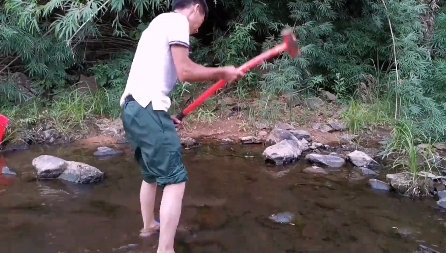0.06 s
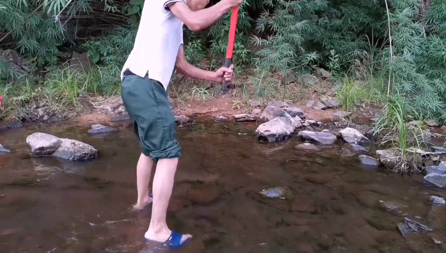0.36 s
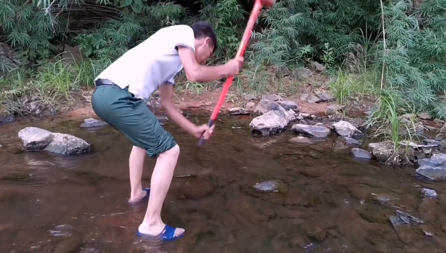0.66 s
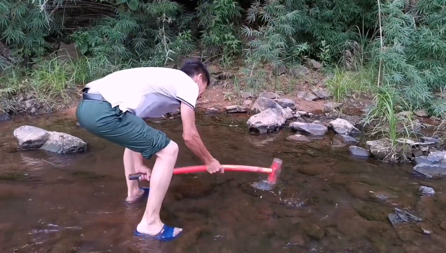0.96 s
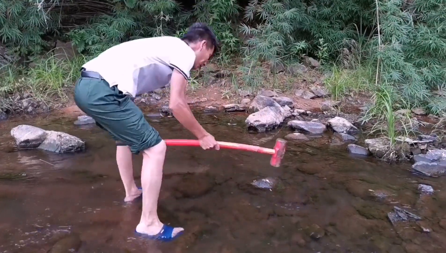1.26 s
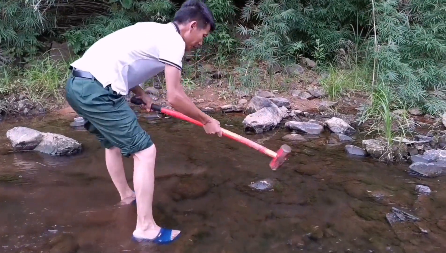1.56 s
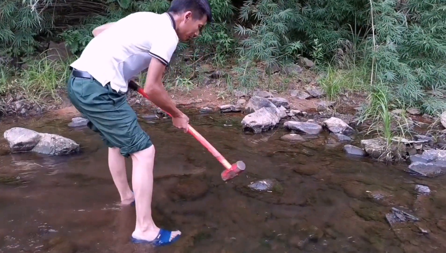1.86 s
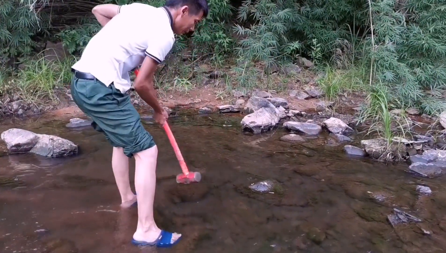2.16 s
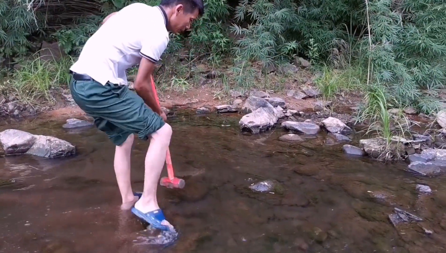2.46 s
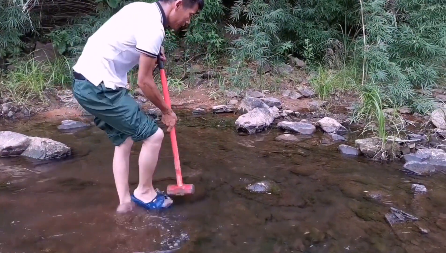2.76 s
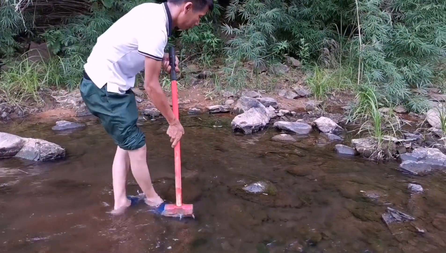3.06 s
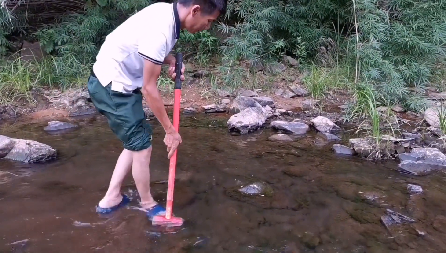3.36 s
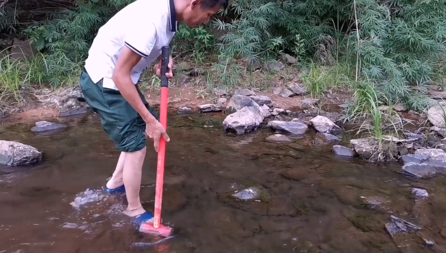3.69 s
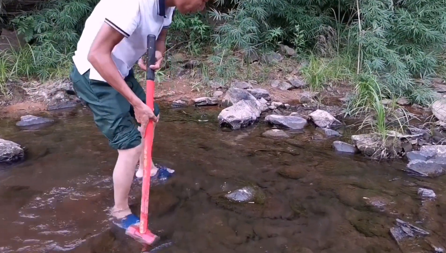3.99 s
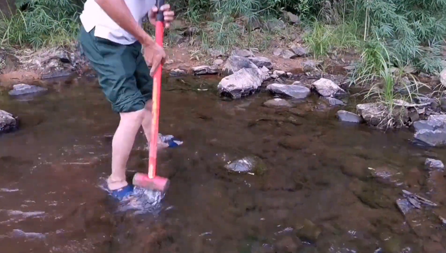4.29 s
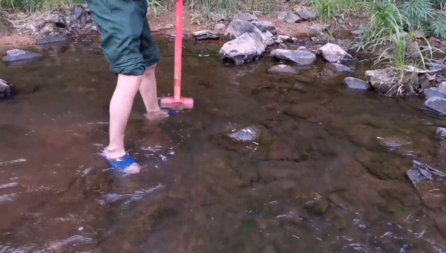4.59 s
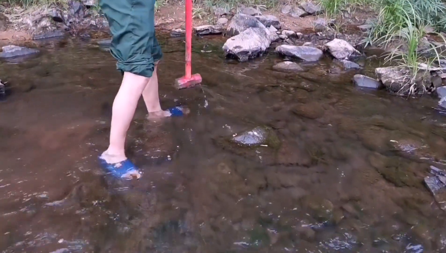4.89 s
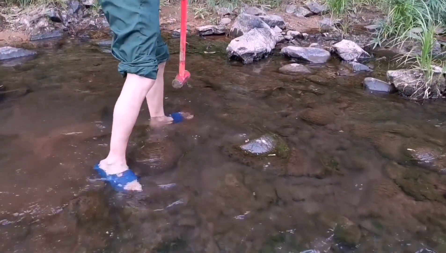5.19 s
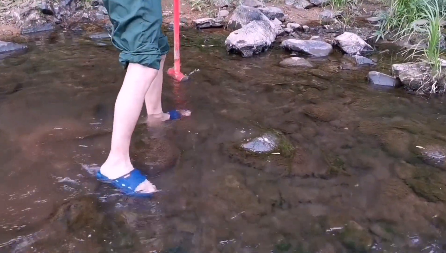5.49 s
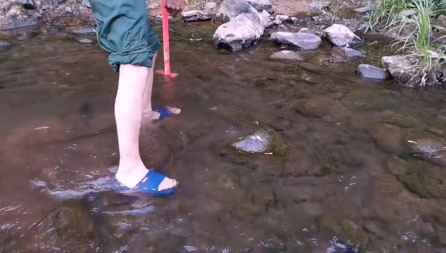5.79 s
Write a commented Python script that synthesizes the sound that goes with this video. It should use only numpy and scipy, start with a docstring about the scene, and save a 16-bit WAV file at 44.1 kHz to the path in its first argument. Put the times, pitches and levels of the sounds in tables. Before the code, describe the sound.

One sharp crack of a sledgehammer on rock stands out over the faint rush of a stream, close to the microphone in the open air. The running water sounds quieter after the hit. Feet then start moving through the shallows, making small, irregular splashes and gurgling plops. A dull knock comes as the hammer rests on a stone underwater, followed by fuller sloshes and falling drops.

```python
"""Sledgehammer in a shallow stream

Steel hits rock: one dry crack, a thin ring from the head, a short answer from the bank.
The man rests the hammer on the bed with a muffled clunk and wades: sloshes and plops of ringing
bubbles, spray and drips, over a riffle running off to the left.
The blow ducks the automatic gain control, and it stays down."""
import sys
import numpy as np
from scipy import signal
from scipy.fft import rfft, irfft, next_fast_len
from scipy.io import wavfile
from scipy.ndimage import uniform_filter1d, minimum_filter1d, map_coordinates

SR = 44100
rng = np.random.default_rng(int(sys.argv[2]) if len(sys.argv) > 2 else 0)


def to_wav(s):
    """Save 16-bit WAV."""
    ch = np.atleast_2d(s).T  # columns
    pcm = np.round(np.clip(ch, -1, 1) * 32767)  # PCM
    wavfile.write(sys.argv[1], SR, pcm.astype(np.int16))


N = 266364

# the hit and its faint after-knocks: t/s, level/dB, contact/ms, ring and crack offset/dB
BLOWS = [(1.05245, 0, 0.3, -0.5), (1.0808, -28, 0.7, -22), (1.1295, -30, 1.4, -20),
         (1.1757, -26.5, 3.8, -28), (1.1895, -37, 1.2, -20)]
# the head settling on a sunken stone, which rattles: t/s, level/dB, contact/ms
KNOCKS = [(3.3965, -35.5, 0.14), (3.4122, -53, 0.49), (3.427, -54, 0.55), (3.456, -47, 2.3)]
# modes of the rock, its gravel bed, the steel head and the sunken stone: f/Hz, level/dB, t60/s
ROCK_MODES = [(387, -13.9, .023), (952, -7.7, .014), (1465, -5, .0136), (2165, -.5, .0065),
              (3300, -.2, .0026)]
BED_MODES = [(57, -41, .15), (202, -3.2, .0156)]
STEEL_MODES = [(5755, -52, .14), (6790, -27, .05), (6825, -46.5, .32), (7155, -36, .025),
               (8204, -51.5, .46), (8985, -36.5, .11), (9020, -47, .33), (11068, -25.5, .06),
               (11075, -43.5, .36), (11660, -45, .15), (11835, -34, .23), (13045, -53.5, .23),
               (13980, -51, .15), (14750, -49, .17)]
STONE_MODES = [(125, -2, .035), (550, -1, .028), (1385, -2, .026), (2040, -4, .018), (2360, -12, .02)]
# feet and hammer pushing water: crest t/s, length/s, level/dB, surface break/0-1
SURGES = [(2.655, 0.04, -62.5, 0.64), (3.124, .04, -72, 0.85), (3.197, 0.023, -71, 1),
          (3.303, 0.016, -60.5, 0.42), (3.411, 0.047, -61.5, 0.4), (3.672, 0.068, -63, 0.26),
          (3.895, 0.079, -66, 0.6), (4.225, 0.0256, -61, 0.3), (4.368, 0.06, -54, 0.06),
          (4.426, 0.018, -70, 0.13), (4.514, 0.052, -54, 0), (4.548, 0.077, -54.5, 0.8),
          (4.617, 0.027, -71, 0.99), (4.64, 0.1, -75, 0.3), (4.947, 0.054, -63.5, 0.99),
          (5.152, 0.055, -60.5, 0.27), (5.824, 0.059, -64.5, 0.5), (5.9, 0.035, -56, 0.39),
          (6.004, 0.047, -55.5, 0.58)]
# a surge's layers (slosh, splash, spray, patter): offset/dB, extra at full break/dB, delay/s
SURGE_LAYERS = [(7.5, -17.5, 0), (0, 7.5, 0), (-16.5, 28.5, 0.011), (-22.5, 26.5, 0.021)]
# weight landing on the stream bed: t/s, level/dB
TREADS = [(3.42, -55.5), (3.69, -62), (3.88, -61), (4.08, -60), (5.0, -67), (6.005, -61)]
# the biggest bubbles: t/s, peak level/dB, f/Hz, t60/s, mean glide/share of pitch
BUBBLES = [(2.627, -47.5, 810, 0.033, 0.08), (2.655, -55, 1450, .03, 0.098), (2.665, -64, 685, .04, .1),
           (2.76, -48, 1550, 0.032, 0.044), (3.09, -54, 920, .05, 0.17), (3.144, -52.5, 410, 0.084, 0.22),
           (3.225, -55, 600, 0.04, 0.047), (3.295, -47, 1224, 0.037, 0), (3.297, -55, 500, 0.036, 0.21),
           (3.3914, -43, 2220, .018, -0.16), (3.459, -51, 2330, .035, -0.15), (3.618, -54, 1300, .04, 0.29),
           (3.66, -56, 400, .04, 0.017), (3.694, -52, 1530, .03, 0.17), (3.7005, -43.5, 630, 0.038, 0.048),
           (3.702, -43.5, 1160, 0.018, -0.023), (4.222, -45.5, 750, 0.053, 0.11),
           (4.235, -48, 620, 0.049, 0.3), (4.255, -45.5, 535, 0.028, 0.12), (4.2942, -40, 720, .014, 0),
           (4.293, -32, 431, 0.07, -0.084), (4.311, -43, 790, 0.016, -0.19),
           (4.317, -30, 657, 0.032, 0.082), (4.335, -37.5, 430, 0.022, 0.25),
           (4.345, -37, 523, 0.026, 0.055), (4.4765, -35, 595, 0.024, -0.0077),
           (4.487, -38, 477, 0.043, 0.037), (4.506, -42, 472, 0.076, 0.3), (4.53, -41.5, 717, 0.092, 0.23),
           (4.551, -41, 1194, .045, 0.069), (4.616, -47.5, 572, 0.06, 0.044), (4.681, -45, 580, 0.07, 0.27),
           (4.903, -42.5, 983, 0.074, 0.085), (4.9257, -43, 950, 0.028, -0.09), (4.942, -50, 1250, .03, .1),
           (4.9488, -35.5, 990, 0.036, -0.17), (4.956, -42.5, 3100, 0.027, 0.077),
           (4.966, -44, 2190, 0.039, -0.069), (4.965, -44.5, 410, 0.05, 0.14),
           (4.983, -45, 240, 0.054, -0.59), (5.003, -44.5, 1340, 0.011, 0.052),
           (5.108, -53, 1090, .05, -0.017), (5.123, -49, 368, 0.083, 0.62),
           (5.208, -40.5, 2340, 0.049, -0.078), (5.567, -49.5, 477, 0.04, -0.12),
           (5.729, -51, 192, 0.045, 0.32), (5.786, -48, 705, .035, 0.2), (5.806, -46.5, 1310, 0.048, 0.13),
           (5.884, -53, 610, 0.081, -0.43), (5.886, -41.5, 1420, 0.023, 0.14),
           (5.891, -45, 1230, 0.044, -0.019), (5.903, -44, 1320, 0.083, 0.22),
           (5.904, -49, 352, 0.069, 0.39), (5.914, -46, 1405, 0.041, 0.28),
           (5.915, -42.5, 409, 0.059, 0.16), (5.945, -51, 577, 0.092, 0.25),
           (5.962, -38.5, 1895, 0.031, -0.13), (5.97, -47, 260, 0.062, 0.11), (5.977, -56, 1050, .04, .2),
           (5.991, -44.5, 129, 0.048, 0.14), (5.993, -39.5, 260, 0.13, 0.089),
           (6.008, -53, 1135, 0.095, 0.23), (6.031, -41.5, 1270, 0.054, 0)]
# drops slapping the surface: t/s, level/dB, t60/s
DROPS = [(1.236, -48.5, .035), (3.2266, -46.5, .05), (4.0176, -50.5, .02), (4.381, -49, .033),
         (4.423, -54, .015), (4.726, -48, .025), (4.7415, -45, .01), (4.951, -46, .033),
         (4.972, -44.5, 0.039), (5.193, -48.5, 0.044), (5.568, -47.5, 0.019)]
# noise colours of crack, bank echo, footfall, spray, drip and running water: f/Hz, level/dB
CRACK_EQ = [(1500, -25), (4100, -16), (5500, 0), (7000, 1), (8200, -5), (11000, 0), (13500, 0), (15500, -9)]
BANK_EQ = [(30, -17), (100, 0), (300, -.5), (650, -.5), (1300, -10.5), (1800, -17), (4200, -16.5),
           (7000, -13.5), (12000, -12), (15000, -17)]
TREAD_EQ = [(15, -11), (50, -8), (130, -20), (220, -8), (600, -68)]
SPRAY_EQ = [(1500, -22), (3000, -0.5), (5000, 5), (6000, 1.5), (8300, 3.5), (10500, -1), (12500, 1.5),
            (14500, -3.5)]
DRIP_EQ = [(1500, -6), (4000, -5), (8000, 1.5), (11000, -2), (14500, -5.5)]
RIFFLE_EQ = [(20, -10), (60, -9.5), (130, -8.5), (260, -5), (600, 0.5), (1000, -3), (1500, -6.5),
             (2100, -6.5), (3300, -12), (5000, -13.5), (6900, -16), (8300, -12.5), (10000, -17),
             (13500, -18), (15500, -19.5)]
# stereo image of the crack and the running water: f/Hz, left-right correlation
CRACK_IMAGE = [(1000, 0.82), (5000, -0.26), (8000, -0.24), (12000, -0.28)]
RIFFLE_IMAGE = [(50, 0.49), (200, 0.99), (600, 0.051), (1000, 0.93), (1600, 0.54), (2100, 0.81),
                (3200, 0.23), (7000, 0.0315)]


def hammer():
    """The blow drives the rock into its bed, cracks off grit and rings the steel; the bank answers."""
    t = np.arange(SR // 2) / SR
    knock, bright = np.zeros(N), np.zeros((2, N))
    body = ringing(BED_MODES, t) - ringing(ROCK_MODES, t)  # the bed pushes back against the rock
    # the rebounding head turns, so its ring flutters differently left and right
    flutter = .5 * signal.resample(rng.standard_normal((len(STEEL_MODES), 2, len(t) // 400)),
                                   len(t), axis=2)
    ring = sum(amp(db - 60 * t / t60) * np.sin(2 * np.pi * hz * t + turn) * (1 + turn)
               for (hz, db, t60), turn in zip(STEEL_MODES, flutter))
    snap = amp(-22 - 60 * t / .008)
    grit = amp(-45 - 60 * t / .115) * unit(amp(8 * np.clip(wobble(700)[:len(t)], -2, 2)))
    near_stones, foliage = amp(-25.5 - 60 * t / .11), amp(-40.5 - 60 * t / .44)
    answer = (near_stones + foliage) * (1 - np.exp(-t / .0049))  # the scatter builds up
    for s, db, contact_ms, ring_db in BLOWS:
        add(knock, s, amp(db) * struck(body, contact_ms))
        crack = noise(CRACK_EQ, CRACK_IMAGE, len(t)) * (snap + grit)
        echo = noise(BANK_EQ, [(200, .92), (1500, .044), (5000, .12)], len(t)) * answer
        add(bright, s, amp(db + ring_db) * (ring + crack) + amp(db) * echo)
    # the water mirrors the knock 1.6 ms later, and a small rock radiates little deep bass
    mirror = lambda hz: 1 + .35 * np.exp(-2j * np.pi * hz * .0016)
    radiated = filtered(knock, lambda hz: mirror(hz) * 1j * hz / (1j * hz + 70))
    return placed(radiated, lead_ms=-.045, pan_db=-1.1) + bright


def set_down():
    """The head comes to rest on a sunken stone with a hollow clunk; the water muffles the top end."""
    t, clunk = np.arange(SR // 8) / SR, np.zeros(N)
    for s, db, contact_ms in KNOCKS:
        add(clunk, s, amp(db) * struck(ringing(STONE_MODES, t), contact_ms))
    muffled = signal.sosfilt(signal.butter(4, 2700, fs=SR, output="sos"), clunk)
    return placed(muffled, lead_ms=.043, pan_db=-1.5)


def wading():
    """Legs thud on the bed and push up sloshes; the surface breaks, spray flies, droplets patter back."""
    slosh_gain, splash_gain, spray_gain, patter_gain = [
        np.sqrt(sum(amp(db + offset_db + break_db * breaking) ** 2 * swell(s + delay, length)
                    for s, length, db, breaking in SURGES))
        for offset_db, break_db, delay in SURGE_LAYERS]
    tread_gain = np.sqrt(sum(amp(db) ** 2 * swell(s, length_s=.028) for s, db in TREADS))
    tread = noise(TREAD_EQ, [(100, .95)], N)
    slosh = froth(count=3200, centre_hz=538.4, spread=.315, cycles=19.8, scatter_db=-1.5, width=.23)
    splash = froth(count=4000, centre_hz=1407, spread=.364, cycles=46, scatter_db=0, width=.86)
    clumps = amp(2.6 * wobble(600) + 1.3 * wobble(110))  # spray lands in handfuls
    mist = unit(noise(SPRAY_EQ, [(5000, .32)], N) * clumps)
    droplets = froth(count=2200, centre_hz=11500, spread=.19, cycles=35, scatter_db=4, width=.9)
    fizz = froth(count=1800, centre_hz=2400, spread=.2, cycles=35, scatter_db=4, width=.6)
    spray = placed(spray_gain * (mist + amp(-6.5) * fizz) + patter_gain * droplets, lead_ms=0, pan_db=3.5)
    water = placed(slosh_gain * slosh + splash_gain * splash, lead_ms=.081, pan_db=-1.5)
    return tread_gain * tread + water + spray


def plops():
    """Big air pockets close behind the feet and the hammer head, each with its own ring and glide."""
    t, track = np.arange(SR // 8) / SR, np.zeros(N)
    for s, db, hz, t60, glide in BUBBLES:
        # the pitch wavers by about 4 % as the bubble changes shape
        drift = .04 * np.cumsum(signal.resample(rng.standard_normal(20), len(t))) / SR
        ring = bubble(t + drift, hz, t60, glide, attack_cycles=.99)
        add(track, s, amp(db) * ring / np.abs(ring).max())
    return placed(track, lead_ms=.082, pan_db=-2)


def drips():
    """Falling drops slap the surface in short, bright ticks."""
    t, track = np.arange(SR // 8) / SR, np.zeros((2, N))
    for s, db, t60 in DROPS:
        add(track, s, noise(DRIP_EQ, [(5000, .71)], len(t)) * amp(db - 60 * t / t60))
    return track


def riffle():
    """Water runs over stones off to the left, with a light rumble of air on the microphone."""
    flow = amp(.15 * wobble(3) + .35 * wobble(25))
    rush = noise(RIFFLE_EQ, RIFFLE_IMAGE, N) * flow
    babble = froth(count=1200, centre_hz=657.6, spread=.514, cycles=48, scatter_db=.5, width=.27)
    trickle = froth(count=1700, centre_hz=9000, spread=.28, cycles=40, scatter_db=3.5, width=.5)
    breeze = amp(4.5 * wobble(6))
    air = noise([(15, -11), (45, -23), (110, -28.5), (300, -80), (1000, -120)], [(50, .61)], N) * breeze
    water = amp(-56.5) * rush + amp(-66.5) * babble + amp(-69.5) * trickle
    return placed(water, lead_ms=.455, pan_db=.1) + amp(-75.5) * air


def ringing(modes, t):
    """A solid rings as one damped sine per mode."""
    return sum(amp(db - 60 * t / t60) * np.sin(2 * np.pi * hz * t) for hz, db, t60 in modes)


def struck(body, contact_ms):
    """Drive a body with a half-sine push: the longer the contact, the duller the knock."""
    length = contact_ms * SR / 1000
    push = np.sin(np.pi * np.arange(np.ceil(length)) / length)
    return np.convolve(body, push / push.sum())[:len(body)]


def bubble(t, hz, t60, glide, attack_cycles):
    """An air pocket rings; a positive glide bends it up, as when it nears the surface."""
    phase = 2 * np.pi * hz * t * (1 + glide * t / t60)
    return np.sin(phase) * amp(-60 * t / t60) * (1 - np.exp(-(t * hz / attack_cycles) ** 2))


def froth(count, centre_hz, spread, cycles, scatter_db, width):
    """A stereo cloud of small bubbles, rms 1."""
    t = np.arange(int(min(SR * cycles / centre_hz, SR // 40))) / SR
    start = rng.integers(0, N, (count, 1))
    pitch, size, pan = rng.standard_normal((3, count, 1))
    hz = centre_hz * np.exp(spread * np.clip(pitch, -2, 2))
    gain = amp(scatter_db * np.clip(size, -2, 2))
    grains = gain * bubble(t, hz, cycles / hz, glide=.44, attack_cycles=.54)
    at = (start + np.arange(len(t))).ravel()
    channels = [np.bincount(at, (grains * (1 + side * width * pan)).ravel(), N)[:N] for side in (1, -1)]
    return unit(np.array(channels))


def swell(crest_s, length_s):
    """Power envelope of a push that crests, then ebbs a little faster than it rose."""
    t = np.arange(N) / SR - crest_s
    slope_s = length_s * np.where(t < 0, .6, .52)
    return np.exp(-np.abs(t / slope_s) ** 1.02)


def noise(eq, image, size):
    """Stereo noise of rms 1, shaped by curves of colour and left-right correlation."""
    def mid_side(hz):
        angle = np.arccos(np.clip(along(image, hz), -1, 1)) / 2
        return amp(along(eq, hz)) * [np.cos(angle), np.sin(angle)]
    mid, side = filtered(rng.standard_normal((2, size)), mid_side)
    return unit(np.array([mid + side, mid - side]))


def placed(x, lead_ms, pan_db):
    """Pan by time and level: positive values make the left earlier and louder."""
    side = np.array([[.5], [-.5]])
    return amp(side * pan_db) * filtered(x, lambda hz: np.exp(2j * np.pi * hz * side * lead_ms / 1000))


def filtered(x, response):
    """Apply a complex frequency response."""
    size = x.shape[-1]
    padded = next_fast_len(size + SR // 4)
    return irfft(rfft(x, padded) * response(np.fft.rfftfreq(padded, 1 / SR)), padded)[..., :size]


def wobble(rate):
    """Smooth random modulation, rate knots a second."""
    return map_coordinates(rng.standard_normal(int(N * rate / SR) + 4), [np.arange(N) * rate / SR])


def along(points, hz):
    """Read a breakpoint curve on a log frequency axis."""
    f, value = np.transpose(points)
    return np.interp(np.log(hz + 1), np.log(f + 1), value)


def add(track, s, sound):
    """Mix a sound into a track at time s."""
    room = track[..., round(s * SR):][..., :sound.shape[-1]]
    room += sound[..., :room.shape[-1]]


def amp(db):
    """Decibels to gain."""
    return 10 ** (np.asarray(db) / 20)


def unit(x):
    """Scale to rms 1."""
    return x / np.sqrt(np.mean(x ** 2) + 1e-20)


def scene():
    """The stream, the blow and the steps after it."""
    return riffle() + hammer() + set_down() + wading() + plops() + drips()


def gain_control(x, boost_db, limit_db):
    """Each channel is boosted until a loud peak takes the boost away, with no release."""
    held_peak = np.maximum.accumulate(np.abs(x), axis=1) + 1e-9
    gain = np.clip(amp(limit_db) / held_peak, 1, amp(boost_db)[:, None])
    return x * uniform_filter1d(minimum_filter1d(gain, size=256), size=256)


def record(dry):
    """Gain control, a soft clip at full scale and a brick-wall high cut."""
    ducked = gain_control(dry, boost_db=[10.1, 7.3], limit_db=-20)
    clipped = ducked / (1 + ducked ** 8) ** (1 / 8)
    return filtered(clipped, lambda hz: hz < 15750)


dry = scene()
out = record(dry)
to_wav(out)
```